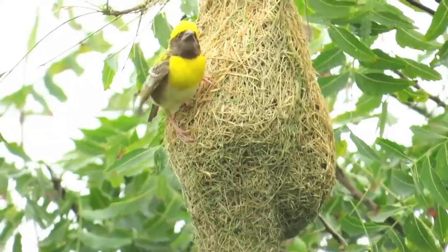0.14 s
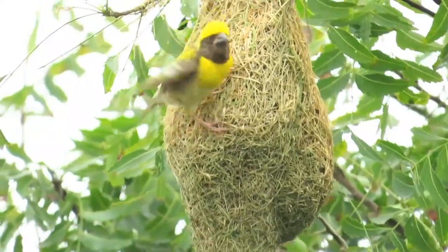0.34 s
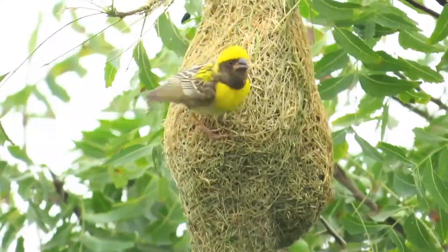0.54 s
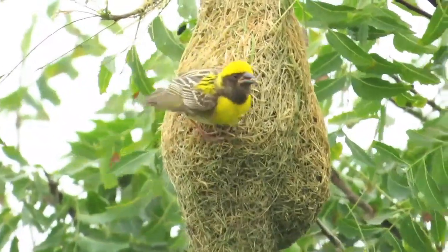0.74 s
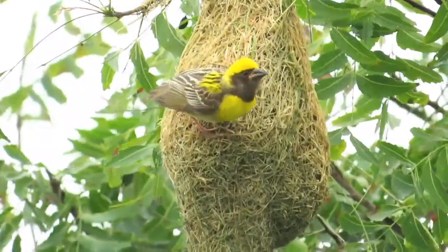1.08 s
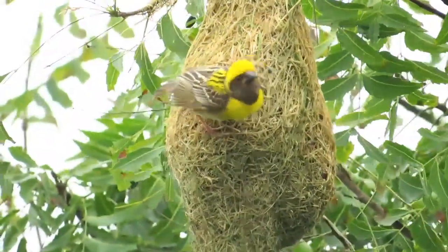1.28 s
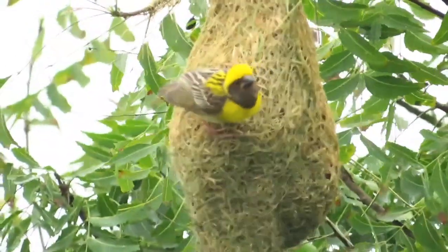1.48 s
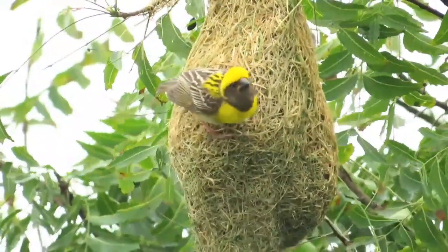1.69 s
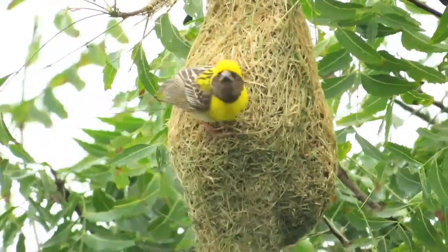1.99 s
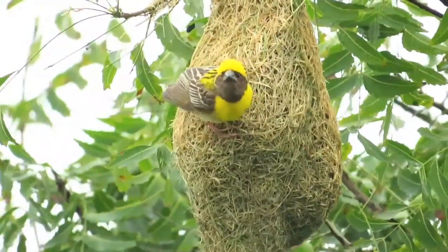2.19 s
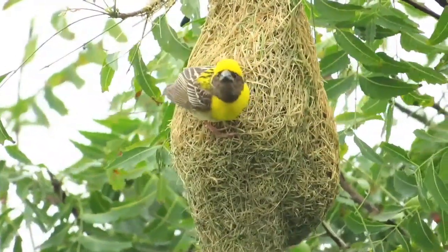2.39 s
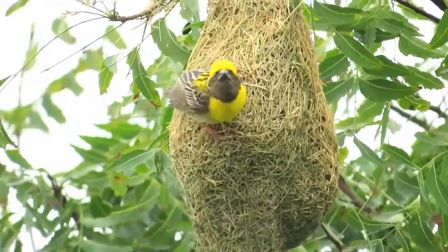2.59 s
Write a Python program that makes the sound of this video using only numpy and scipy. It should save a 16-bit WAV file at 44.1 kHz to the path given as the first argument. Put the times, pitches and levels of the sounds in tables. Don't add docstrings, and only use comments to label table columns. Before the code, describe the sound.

A weaver bird chatters in quick raspy trills while neighbours trill and chip over it, then gives a long rising whistle, a short high pipe and a buzzy wheeze; outdoors, soft wind, small stereo microphone.

```python
import sys
import numpy as np
from scipy import signal
from scipy.io import wavfile
from scipy.ndimage import uniform_filter1d

SR = 44100
rng = np.random.default_rng(int(sys.argv[2]) if len(sys.argv) > 2 else 0)


def voltage_ratio(decibels):
    exponent = np.asarray(decibels, float) / 20
    return 10 ** exponent


def wav_record(signal):
    frames = np.transpose(np.atleast_2d(signal))
    bounded = np.clip(frames, -1, 1)
    quanta = np.round(bounded * 32767).astype(np.int16)
    wavfile.write(sys.argv[1], SR, quanta)


N = 120834


def evened(x):
    return x / np.sqrt(np.mean(x ** 2) + 1e-20)


def add(mix, start_s, sound):
    at = round(start_s * SR)
    sound = sound[max(-at, 0):]
    part = mix[max(at, 0):][:len(sound)]
    part += sound[:len(part)]


def drift(count, size):
    noise = rng.standard_normal(count)
    return evened(uniform_filter1d(uniform_filter1d(noise, size), size))


def tone(hz, overtone_db):
    phase = 2 * np.pi * (np.cumsum(hz) / SR + rng.random())
    return np.sqrt(2) * (np.sin(phase) + voltage_ratio(overtone_db) * np.sin(2 * phase))


def resonate(x, hz, width_hz):
    turn = np.exp(2j * np.pi * np.cumsum(hz) / SR)
    r = np.exp(-np.pi * width_hz / SR)
    return 2 * (turn * signal.lfilter([1 - r], [1, -r], x / turn)).real


def trill(start_s, length_s, db, top_hz, bottom_hz, rate_hz, shake, puff_db, hold_s, fade_db_per_khz, scatter):
    chirp_s, hook_s, edge_s = .0175, .003, .006
    out = np.zeros(8000)
    t = np.arange(0, chirp_s, 1 / SR)
    slide = np.clip((t - hook_s - hold_s) / (chirp_s - hook_s - hold_s), 0, 1)
    drop_hz = (top_hz - bottom_hz) * slide
    hook = np.clip(1 - t / hook_s, 0, 1) ** 2
    puff_hz = max(3540, bottom_hz) + 0 * t
    chance = rng.standard_normal((8, 3))
    for k in range(8):
        rasp = 1 + .5 * drift(count=1500, size=24)[:len(t)]
        shaking = 1 + shake * drift(count=1500, size=50)[:len(t)]
        hook_depth = .14 * (2.4 if k == 0 else 1)
        top = top_hz * (1 + scatter * .006 * chance[k, 0])
        hz = top * (1 - hook_depth * hook) - drop_hz
        voice = rasp * voltage_ratio(fade_db_per_khz * drop_hz / 1000) * tone(hz * shaking, overtone_db=-25)
        puff = rng.standard_normal(1500)[:len(t)]
        for _ in range(3):
            puff = resonate(puff, puff_hz, width_hz=3000)
        at_s = k / rate_hz
        reach = np.clip((length_s - at_s) / edge_s, 0, 1)
        shape = abs(np.sin(np.pi * t / chirp_s)) ** 0.24 * voltage_ratio(1.3 * chance[k, 1])
        chirp = reach * shape * (voice + voltage_ratio(puff_db) * evened(puff))
        add(out, at_s + .0007 * abs(chance[k, 2]), chirp)
    return start_s, voltage_ratio(db - 2) * out


# t/s, length/s, level/dB, top f/Hz, bottom f/Hz
WEAVER_TRILLS = [(-.03, 0.041, -56.5, 4250, 2650), (0.026, .045, -53, 4396, 2500),
                 (0.088, 0.033, -62, 4300, 2650), (0.165, 0.063, -51.5, 4420, 2670),
                 (0.245, 0.075, -52, 4400, 2610), (.32, 0.07, -50.5, 4420, 2580),
                 (0.395, 0.041, -51.5, 4420, 2860), (1.128, 0.054, -57, 4650, 2810),
                 (1.22, 0.053, -55, 4420, 2800), (1.288, 0.06, -55, 4390, 2670),
                 (1.365, 0.062, -56.5, 4360, 2600), (1.442, 0.065, -58, 4400, 2680),
                 (1.518, 0.039, -57, 4300, 2440)]


def weaver_trills():
    return [trill(*row, rate_hz=82, shake=.019, puff_db=-7, hold_s=.0056, fade_db_per_khz=-1.2, scatter=1)
            for row in WEAVER_TRILLS]


# t/s, level/dB
WHISTLE = [
    (1.68, -69),
    (1.726, -61),
    (1.752, -54.5),
    (1.782, -57),
    (1.858, -58),
    (1.93, -56),
    (2.03, -55),
    (2.216, -54),
]
# t/s, half length/s, dip/dB
BREAKS = [
    (1.886, .015, -16),
    (1.975, .022, -10),
]


def whistle():
    start_hz, plateau_hz, climb_s, creep_hz_per_s = 2100, 2860, .064, 90
    end_sag_hz, lift_s, lift_hz = 20, 2.01, 38
    s, db = np.transpose(WHISTLE)
    t = np.arange(0, s[-1] - s[0] + .015, 1 / SR)
    clock = t + s[0]
    left = t[-1] - t
    hz = plateau_hz - (plateau_hz - start_hz) * np.exp(-t / climb_s) + creep_hz_per_s * t
    hz = hz - end_sag_hz * np.exp(-left / 0.04) + 10 * drift(count=SR, size=500)[:len(t)]
    hz = hz + lift_hz / (1 + np.exp((lift_s - clock) / .015))
    dips_db = sum(dip * np.exp(-((clock - at) / half) ** 4) for at, half, dip in BREAKS)
    waver_db = 0.39 * drift(count=SR, size=300)[:len(t)]
    level = voltage_ratio(np.interp(clock, s, db) + dips_db + waver_db) * np.minimum(left / 0.01, 1)
    return s[0], level * tone(hz, overtone_db=-47)


def traced_whistle(rows):
    s, hz, db = np.transpose(rows)
    t = np.arange(s[0], s[-1], 1 / SR)
    level = voltage_ratio(np.interp(t, s, db)) * signal.windows.tukey(len(t), .1)
    return s[0], level * tone(np.interp(t, s, hz), overtone_db=-39)


# t/s, f/Hz, level/dB
SECOND_VOICE = [
    (1.645, 4980, -74),
    (1.69, 4600, -72),
    (1.715, 4240, -68),
    (1.77, 4098, -68.5),
    (1.81, 4000, -76),
]


def second_voice():
    return traced_whistle(SECOND_VOICE)


# t/s, f/Hz, level/dB
PIPE = [
    (2.322, 3860, -68),
    (2.332, 3885, -59),
    (2.355, 3938, -52),
    (2.394, 3955, -54),
    (2.408, 3900, -64),
]


def pipe():
    return traced_whistle(PIPE)


def wheeze(rows):
    s, rate_hz, hz, db, alternate = np.transpose(rows)
    t = np.arange(s[0], s[-1], 1 / SR)
    jitter = 1 + .005 * drift(count=SR, size=300)[:len(t)]
    turns = np.cumsum(np.interp(t, s, rate_hz) * jitter) / SR
    pulses = sum(np.cos(2 * np.pi * k * turns) for k in range(8, 26))
    pulses = pulses * (1 + np.interp(t, s, alternate) * np.cos(np.pi * turns))
    drive = evened(pulses) + 1.05 * rng.standard_normal(SR)[:len(t)]
    centre_hz = np.interp(t, s, hz)
    once = resonate(drive, centre_hz, width_hz=420)
    twice = resonate(once, centre_hz, width_hz=420)
    skirt_db = -8
    return s[0], voltage_ratio(np.interp(t, s, db)) * evened(twice + voltage_ratio(skirt_db) * once)


# t/s, pulse rate f/Hz, resonance f/Hz, level/dB, strong-weak share
LOW_WHEEZE = [
    (2.40, 278, 3830, -65, .5),
    (2.46, 283, 3880, -64.5, .6),
    (2.54, 287, 3950, -62, .6),
    (2.59, 280, 3980, -63, .5),
    (2.63, 271, 3930, -59.5, .4),
    (2.65, 270.5, 3910, -58.5, .3),
    (2.75, 270, 3900, -59.5, .35),
]


def low_wheeze():
    return wheeze(LOW_WHEEZE)


# t/s, pulse rate f/Hz, resonance f/Hz, level/dB, strong-weak share
HIGH_WHEEZE = [
    (2.402, 266, 5150, -67, .2),
    (2.414, 272, 5330, -61, .2),
    (2.435, 276, 5460, -59, .15),
    (2.475, 276, 5440, -58, .15),
    (2.515, 275, 5400, -63, .35),
    (2.66, 277, 5540, -64, .5),
    (2.75, 277.5, 5630, -61.5, .6),
]


def high_wheeze():
    return wheeze(HIGH_WHEEZE)


# t/s, length/s, level/dB, top f/Hz, bottom f/Hz
NEIGHBOUR_TRILLS = [(.045, 0.061, -61.5, 5600, 2940), (0.299, 0.08, -61, 5340, 2740),
                    (.396, .008, -60, 6000, 4000), (.494, 0.06, -48, 5050, 3140),
                    (0.624, .008, -56, 5000, 3870), (0.641, 0.056, -49, 5150, 3020),
                    (.702, .008, -60, 5800, 4500), (0.795, 0.04, -48.5, 5220, 3360),
                    (.872, 0.053, -52, 4900, 3200), (0.945, 0.03, -63, 5620, 2920),
                    (0.981, 0.056, -51, 5200, 2940), (1.398, 0.02, -63, 5620, 4800),
                    (1.52, 0.03, -59, 5700, 4700), (0.308, .04, -72, 9700, 8200),
                    (0.785, 0.08, -67, 8400, 7150), (.885, .02, -72, 8500, 7600),
                    (0.84, 0.08, -62.5, 6040, 5000)]


def neighbour_trills():
    return [trill(*row, rate_hz=85, shake=.03, puff_db=-5.5, hold_s=.005, fade_db_per_khz=-2.6, scatter=2.5)
            for row in NEIGHBOUR_TRILLS]


# t/s, length/s, level/dB, top f/Hz, bottom f/Hz
LOW_TRILLS = [
    (0.35, 0.046, -54, 3800, 2340),
    (0.49, 0.08, -58, 4000, 2050),
    (0.632, 0.05, -55.5, 4200, 2100),
    (0.76, .008, -63, 4200, 2500),
    (0.749, 0.046, -53.5, 4100, 2230),
    (0.873, 0.045, -56.5, 3600, 2660),
    (1.115, .05, -64, 4100, 2400),
    (0.21, .03, -62, 4900, 1800),
    (0.054, 0.043, -58, 5000, 2400),
]


def low_trills():
    slide_at_once_s = -.003
    return [trill(*row, rate_hz=80, shake=.019, puff_db=-7, hold_s=slide_at_once_s, fade_db_per_khz=.5,
                  scatter=2.5) for row in LOW_TRILLS]


# t/s, length/s, level/dB, first f/Hz, last f/Hz
CHIPS = [(.30, .04, -60.5, 2230, 2160), (0.405, 0.017, -54, 3120, 2980), (0.55, 0.02, -57, 3400, 3260),
         (0.558, 0.032, -60, 4050, 3280), (0.682, .014, -56, 3450, 3300), (0.714, 0.024, -55.5, 4180, 3230),
         (0.728, .013, -63, 7100, 4600), (0.803, 0.016, -51.5, 3480, 3330),
         (0.838, 0.022, -55.5, 4050, 3350), (0.917, 0.018, -53.5, 3600, 3300),
         (1.052, .02, -59, 3950, 3400), (1.07, .018, -65, 3300, 2500), (1.183, 0.06, -65.5, 3760, 3600)]


def chip(start_s, length_s, db, first_hz, last_hz):
    u = np.arange(0, length_s, 1 / SR) / length_s
    husk = 1 + .4 * drift(count=3000, size=60)[:len(u)]
    hz = first_hz + (last_hz - first_hz) * u ** 1.29
    return start_s, voltage_ratio(db + 2.0) * husk * np.sin(np.pi * u) ** 0.23 * tone(hz, overtone_db=-19)


def foliage(x):
    t60_s, gap_s = .15, .003
    t = np.arange(SR // 3) / SR
    tail = rng.standard_normal((2, len(t))) * voltage_ratio(-60 * t / t60_s) * (t > gap_s)
    return signal.fftconvolve(x[None], tail / np.linalg.norm(tail[0]), axes=1)[:, :N]


def air(spectrum, db, patchy_db, swell_db):
    frames = N // 512 + 6
    hz = np.fft.rfftfreq(2048, 1 / SR)
    a, b, patches = rng.standard_normal((frames, 1025, 3)).T
    patches = uniform_filter1d(uniform_filter1d(patches, size=20, axis=0), size=6, axis=1)
    f, level = np.transpose(spectrum)
    colour_db = np.interp(np.log(hz + 1), np.log(f + 1), level, right=-100)
    swell = swell_db * drift(count=frames, size=12)
    z = (a + 1j * b) * voltage_ratio(colour_db[:, None] + patchy_db * evened(patches) + swell)
    return voltage_ratio(db) * evened(signal.istft(z, nperseg=2048, noverlap=1536)[1][:N])


# f/Hz, level/dB per Hz
AIR_MID = [(220, -17), (380, -0.5), (587, -3), (4620, -11), (7710, -20), (11700, -27), (14100, -30.5),
           (15500, -32)]


def mid_air():
    return air(AIR_MID, db=-56.5, patchy_db=1.18, swell_db=0.4)


# f/Hz, level/dB per Hz
AIR_SIDE = [(18, -43), (30, -32), (135, -1.5), (466, -4), (864, -12), (4090, -25.5), (6550, -35.5),
            (8590, -34.5), (11000, -52.5), (14300, -48), (22000, -120)]


def side_air():
    return air(AIR_SIDE, db=-54.5, patchy_db=0.1, swell_db=1.0)


# f/Hz, level/dB per Hz
RUMBLE = [(8.8, -32), (15, -7), (76, 1), (400, -13), (520, -29.5), (880, -120)]


def rumble():
    return air(RUMBLE, db=-53, patchy_db=1.65, swell_db=0.27)


def scene():
    birds = np.zeros(N)
    calls = weaver_trills() + [whistle(), second_voice(), pipe(), low_wheeze(), high_wheeze()]
    calls += neighbour_trills() + low_trills() + [chip(*row) for row in CHIPS]
    for call in calls:
        add(birds, *call)
    echo_db = -11
    mid = mid_air() + rumble()
    side = np.array([[1.], [-1.]]) * side_air()
    return birds + voltage_ratio(echo_db) * foliage(birds) + mid + side


def band_limit(x):
    return signal.sosfilt(signal.butter(12, 15640, fs=SR, output="sos"), x)


def record(dry):
    mix = dry + 0.00037
    return band_limit(mix)


dry = scene()
out = record(dry)
wav_record(out)
```